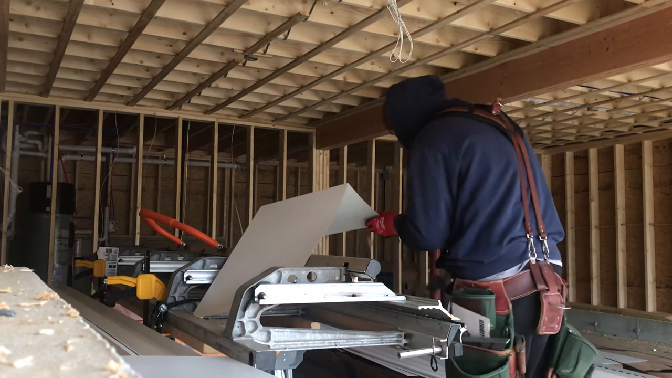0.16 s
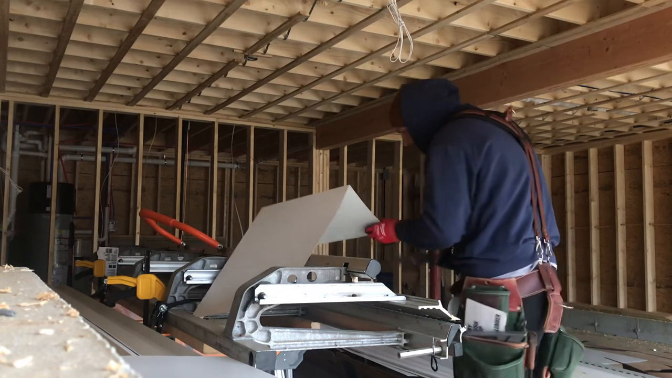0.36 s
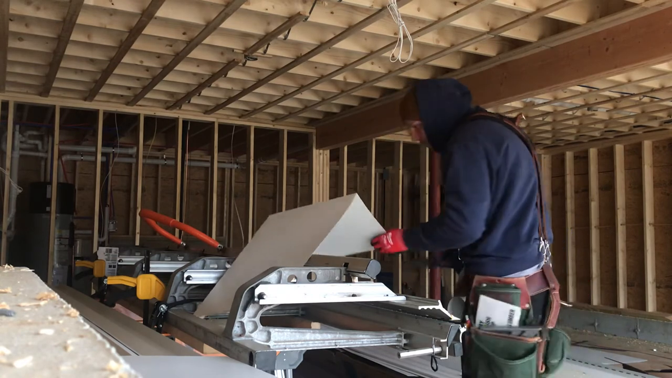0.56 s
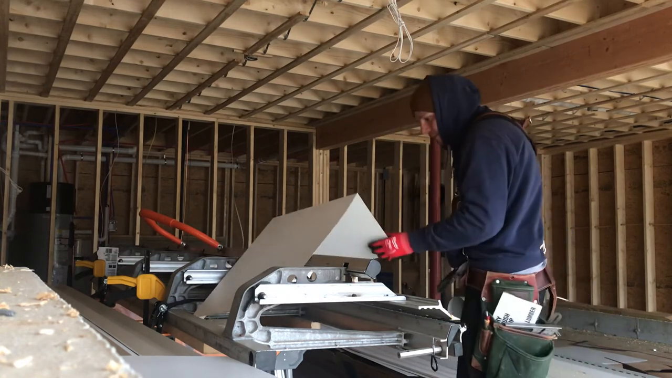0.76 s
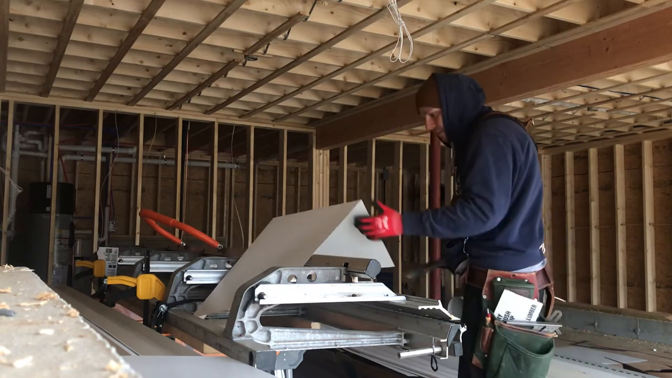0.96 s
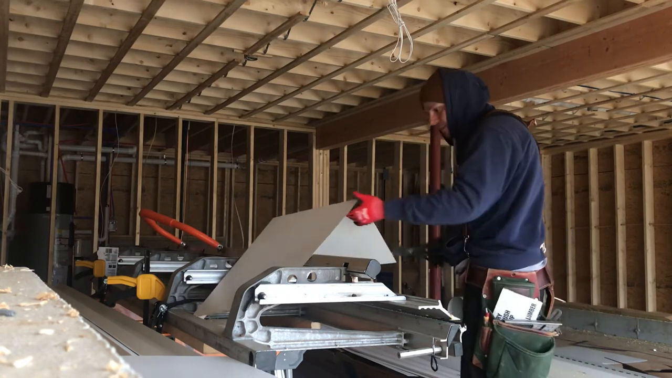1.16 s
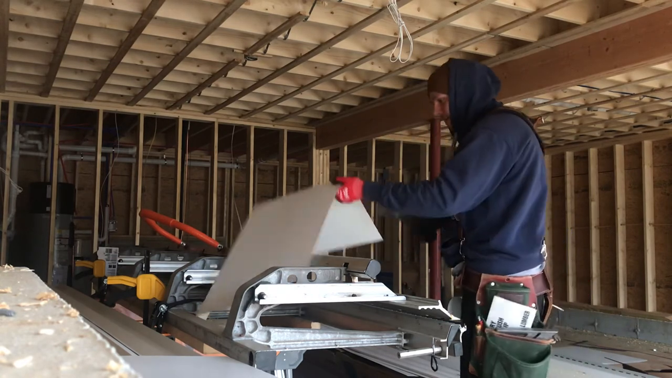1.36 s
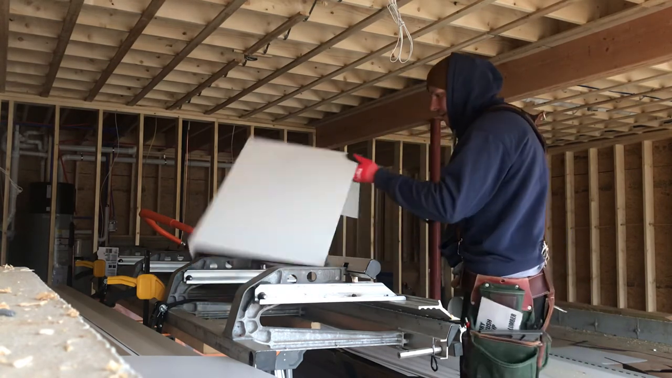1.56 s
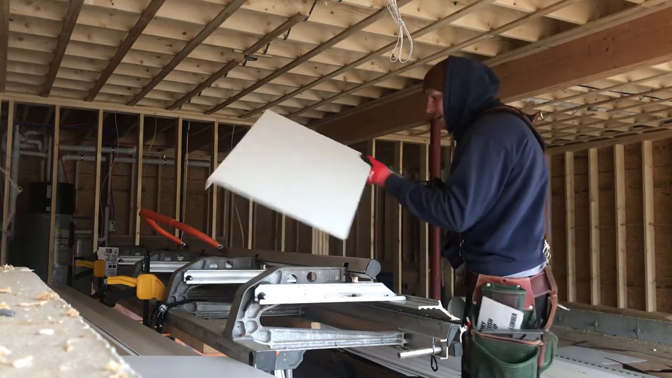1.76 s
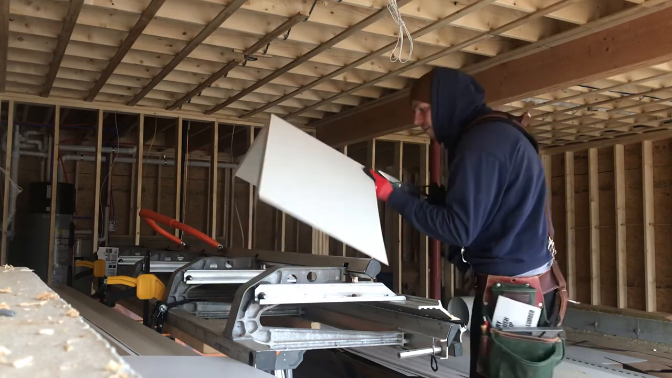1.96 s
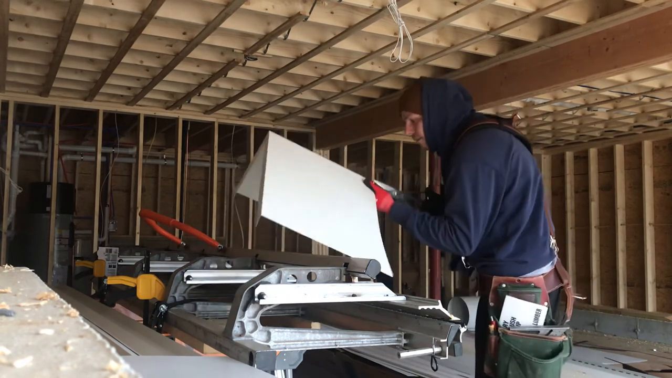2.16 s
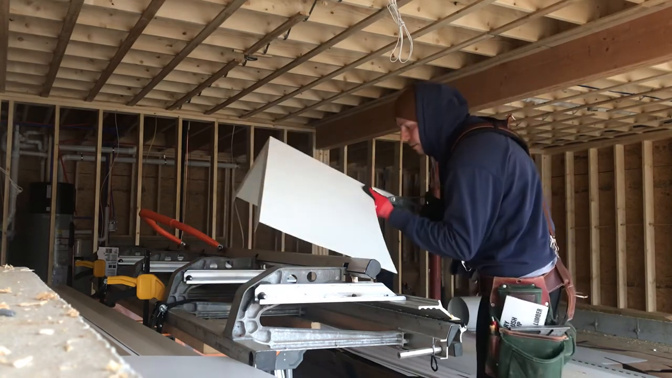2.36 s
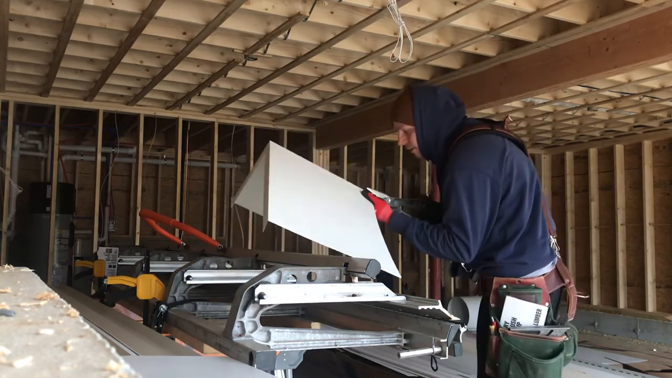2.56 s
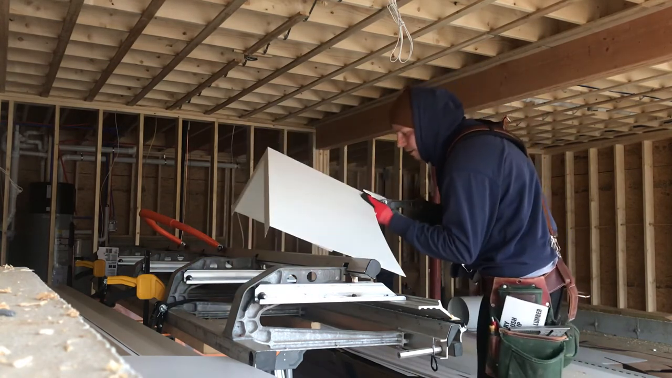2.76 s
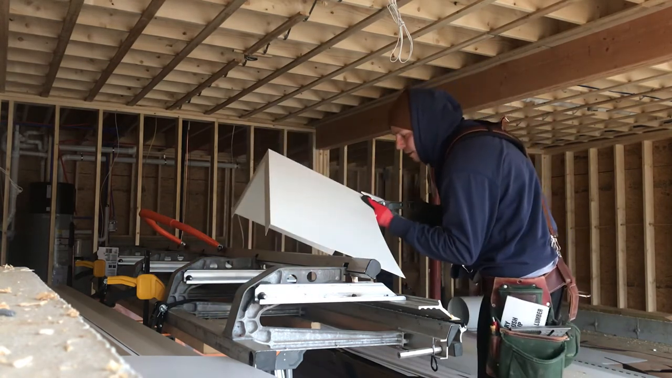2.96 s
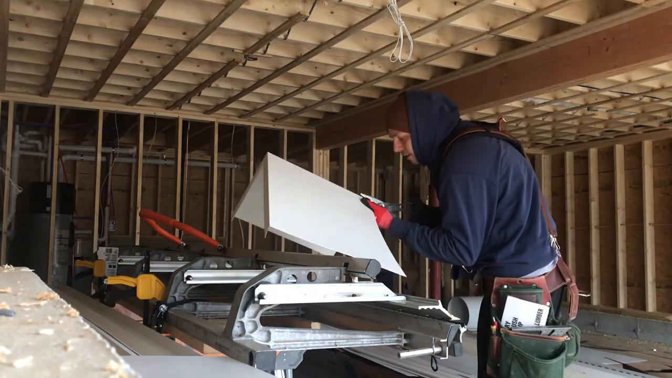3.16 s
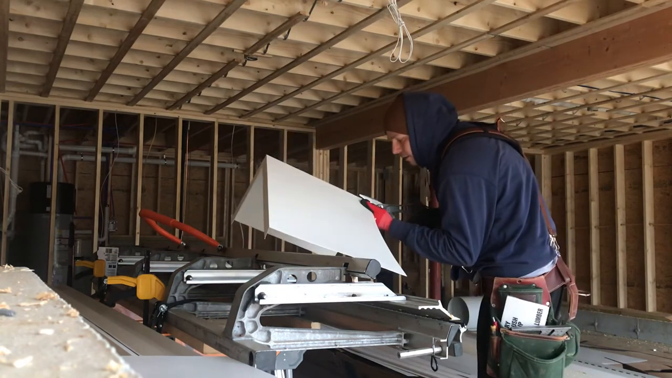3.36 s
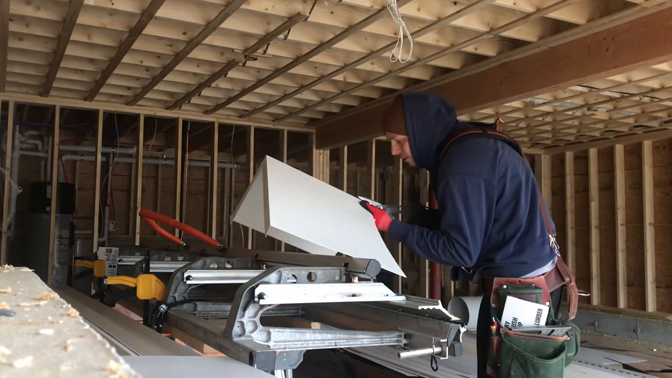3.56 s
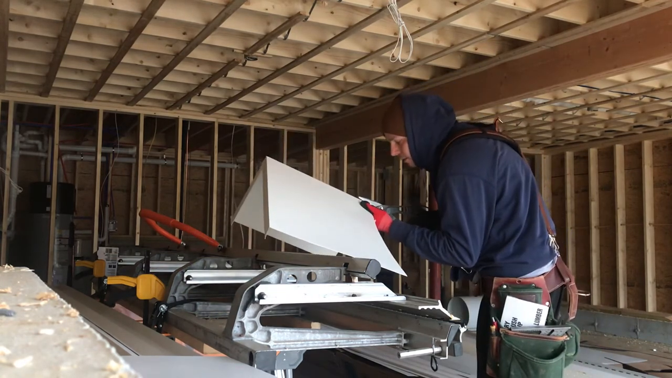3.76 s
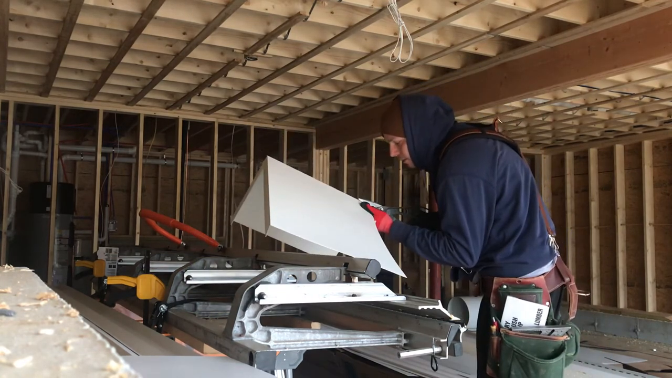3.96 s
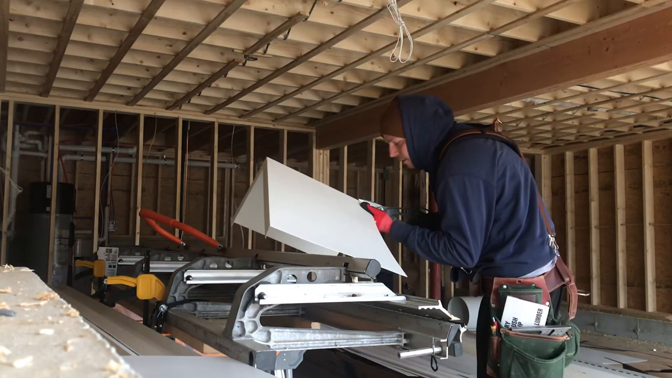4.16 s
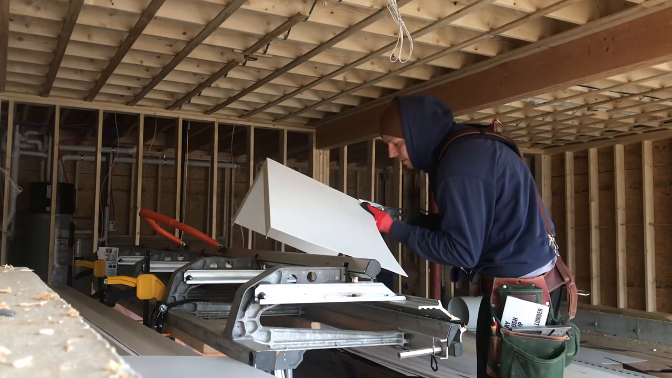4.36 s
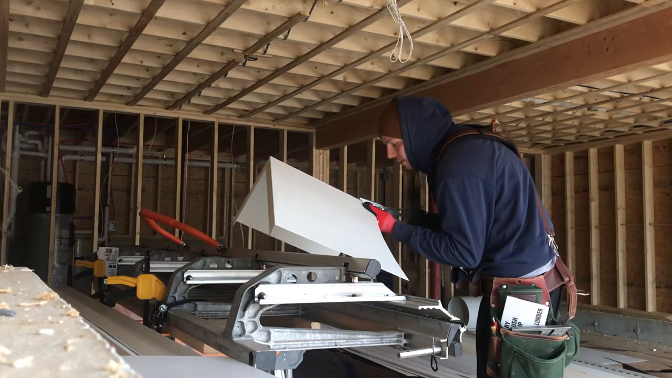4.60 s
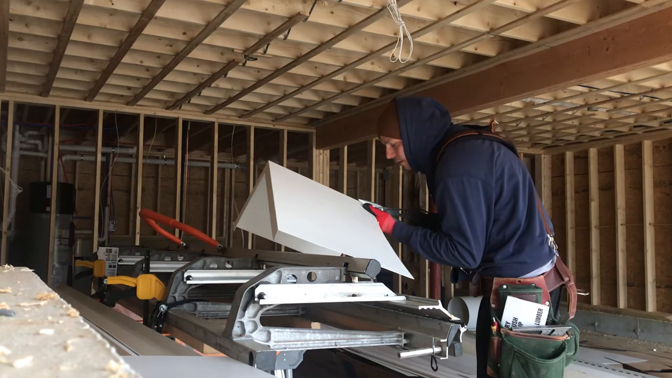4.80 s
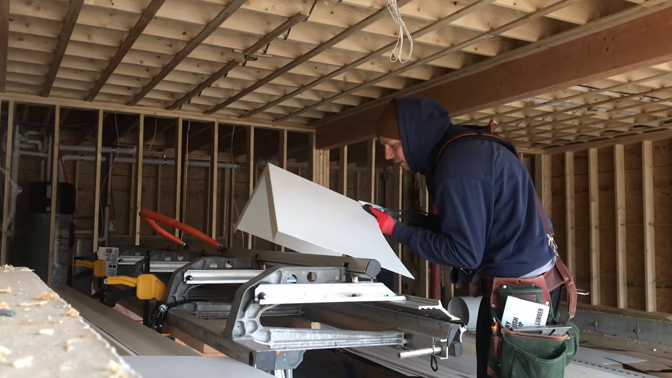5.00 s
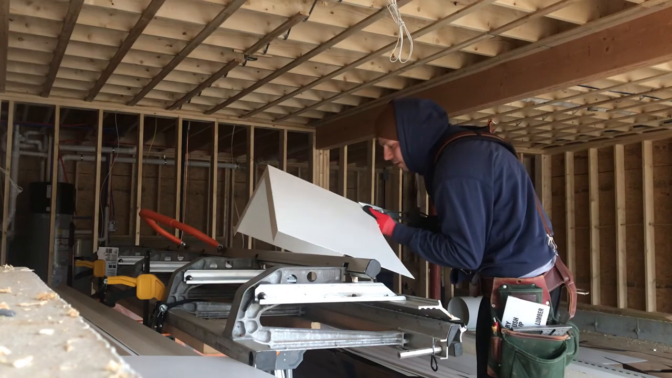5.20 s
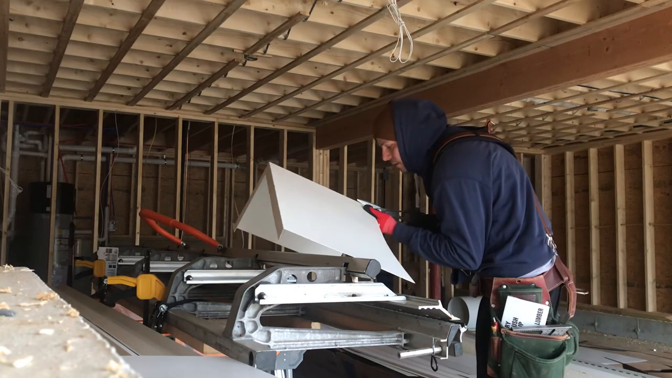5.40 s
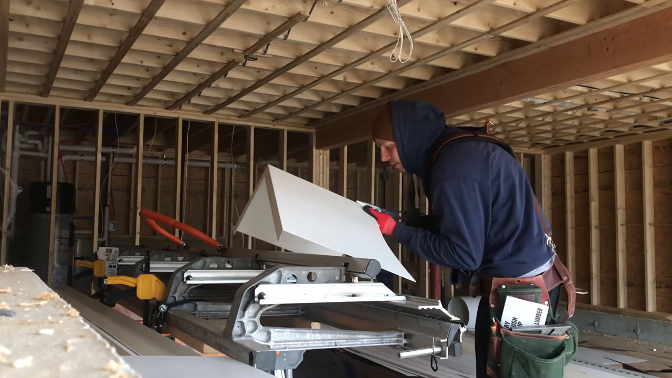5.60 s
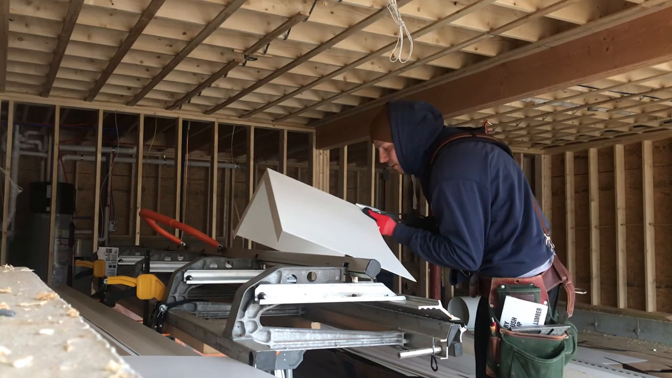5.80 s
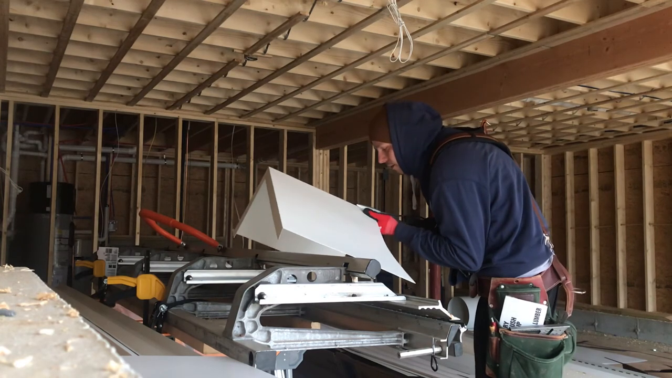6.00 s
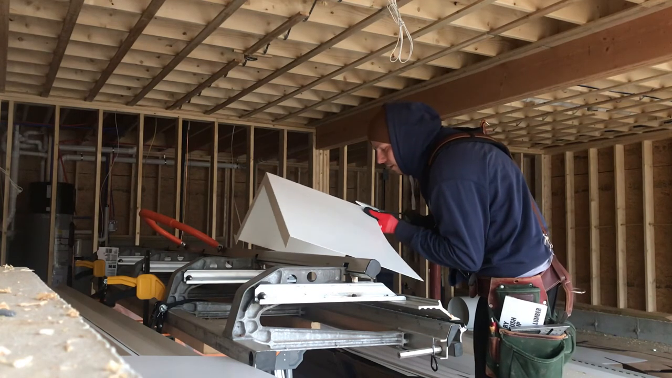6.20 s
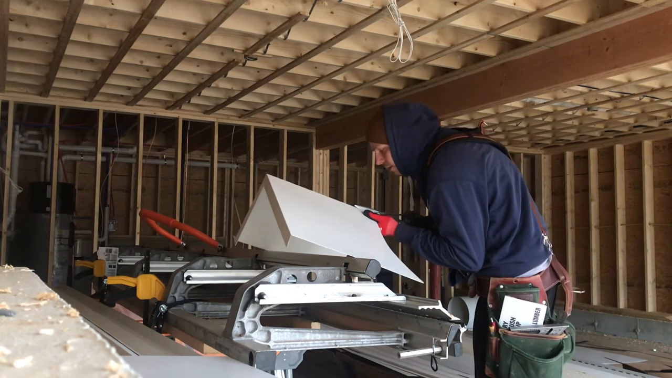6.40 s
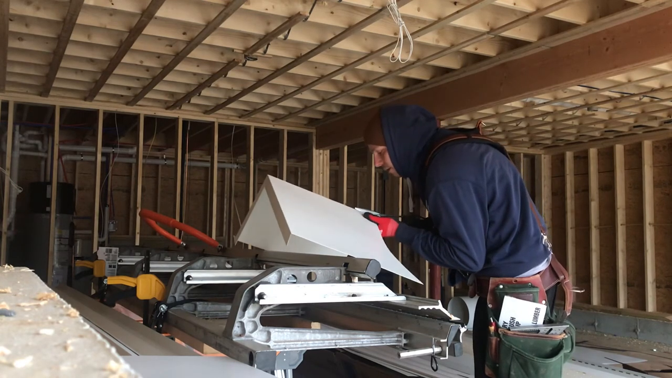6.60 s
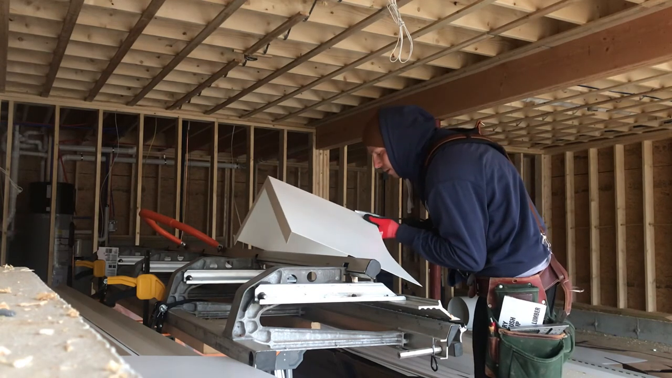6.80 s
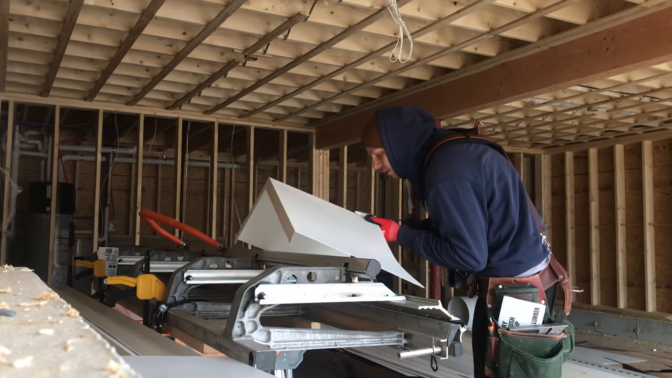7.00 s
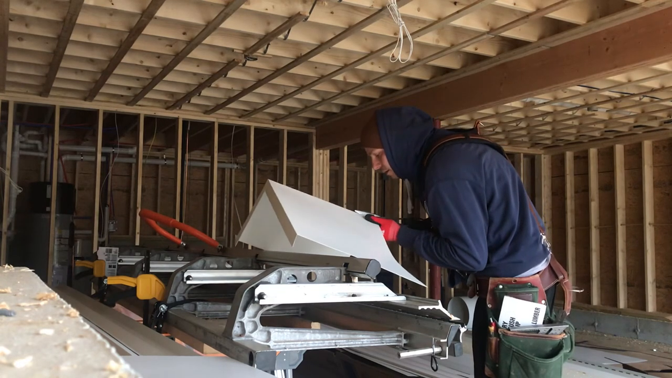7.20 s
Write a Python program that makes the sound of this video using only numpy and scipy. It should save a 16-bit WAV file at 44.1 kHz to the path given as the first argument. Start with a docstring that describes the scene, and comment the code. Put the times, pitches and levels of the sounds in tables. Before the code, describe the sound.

Over a steady machine hum, sheet aluminium clangs, squeaks and booms as it flexes, followed by faint finger ticks and a light double landing.

```python
"""A machine hums throughout while a thin, folded aluminium sheet comes free of a steel bending brake with a clank.
Noise bursts and ringing tones make the clank; knocks, scraping, squeaks and a thunder-like wobble follow.
Then come light ticks under a gloved hand, made of tiny noise cracks, and a hollow rub with a falling pitch.
Last the sheet is set down, fold first and then edge, which rings its flange; a few more knocks and bends follow.
Filtered pulses and noise make the rubbing and scraping; fading noise is the echo of a bare timber room."""
import sys
import numpy as np
from scipy import signal
from scipy.fft import rfft, irfft
from scipy.io import wavfile
from scipy.ndimage import map_coordinates

SR = 44100
rng = np.random.default_rng(int(sys.argv[2]) if len(sys.argv) > 2 else 0)


def store_pcm(level_fs):
    """Save levels as 16-bit WAV."""
    pcm = np.round(np.clip(level_fs, -1, 1) * 32767).astype(np.int16)
    wavfile.write(sys.argv[1], SR, np.atleast_2d(pcm).T)


N = 319725
T = np.arange(N) / SR
RING_T = T[:SR]  # one second, long enough for any single ring

# In all tables "ring time" means the seconds a sound takes to fade by 60 dB.
# How long the thin metal rings. Each row: pitch in Hz, ring time in seconds.
SHEET_RING_TIME = [(200, 0.68), (1000, 0.24), (4000, 0.29), (14000, 0.098)]
# How long the timber room rings. Each row: pitch in Hz, ring time in seconds.
ROOM_RING_TIME = [(150, 1), (600, 0.83), (2000, 0.47), (5000, 0.61), (14000, 0.23)]
TOP_HZ = 15850  # the highest pitch let through

# A machine elsewhere in the building. Each row: pitch in Hz, average (rms) level in dB.
HUM = [(73.4, -34), (138, -51.5), (193.5, -53), (295.6, -61.5), (801, -66)]
# Still air of the building. Each row: pitch in Hz, level in dB per Hz.
AIR = [(22, -99), (45, -71), (95, -65), (140, -71.5), (220, -77), (330, -79.5), (460, -93.5), (800, -86.5),
       (1100, -95), (2000, -101), (4000, -110), (8000, -119), (15500, -120)]
AIR_SWELL_DB = 0.5

# Soft rubbing of gloves and clothes, and the airy treble of the bending panel (near 1.5 and 2.2 s).
# Each row: middle in seconds, length in seconds, level in dB.
SOFT_SWELLS = [(0.01, 0.15, -51), (0.547, 0.67, -48), (1.33, 0.085, -34.5), (1.516, 0.28, -43.5),
               (1.844, 1, -58.5), (2.158, 0.16, -44), (4.346, 0.13, -58), (4.644, 0.27, -60.5),
               (5.035, 0.18, -59), (5.363, 0.22, -52), (5.763, 0.24, -59), (6.12, 0.17, -48.5),
               (6.695, 0.74, -58), (6.985, 0.16, -47.5)]
# Tone of these soft sounds. Each row: pitch in Hz, relative level in dB.
SOFT_COLOUR = [(100, -17), (350, 8.5), (700, 3), (1200, 3.5), (1900, -5.5), (3000, -11), (5000, -18),
               (9000, -23), (15000, -32)]
REST_RUB_DB = -61  # cloth is never quite still
# The glove hisses over the smooth face. Each row: middle in seconds, length in seconds, level in dB.
SWISHES = [(0.0, 0.078, -58.5), (0.49, 0.1, -56), (1.32, 0.18, -58), (1.85, 0.33, -67), (4.65, 0.2, -72),
           (5.34, 0.08, -64), (6.8, 0.31, -67)]
# Tone of that hiss. Each row: pitch in Hz, relative level in dB.
SWISH_COLOUR = [(1500, -15), (3800, 7.5), (5700, 5), (8500, -6), (15000, -11)]

# The sheet strikes the brake and rebounds. Each row: start in seconds, relative level in dB.
CLANKS = [(0.0955, -3.5), (0.105, 0), (0.138, -22)]
# Tone of the clatter. Each row: pitch in Hz, relative level in dB.
CLANK_COLOUR = [(100, -37), (180, -13.5), (250, 6), (320, -8), (400, -11.5), (620, -5), (820, -7.5),
                (1080, 0.5), (1350, -8), (1700, 0.5), (2000, -19.5), (2500, -8), (3400, -18.5), (6000, -22),
                (15000, -29.5)]
CLATTER_T60_S = 0.2
# Ringing groups of tones in the brake. Each row: pitch in Hz, relative level in dB, ring time in seconds.
BRAKE = [(521.5, -7.5, 0.65), (614, -2, 0.45), (781, -6, 0.84), (1063, 7.5, 0.22), (1310, -0.5, 0.3),
         (1520, -3.5, 0.44), (1610, 2, 0.28), (1817, -6, 0.33), (2382, -9.5, 0.41), (2550, -13.5, 0.45),
         (2750, -10, 0.21), (3150, -10, 0.32), (3780, -8.5, 0.31), (4000, -13, 0.41), (4170, -8, 0.31),
         (4380, -13, 0.19), (5300, -10, 0.23), (5550, -16, 0.22), (6000, -12, 0.22), (6680, -11, 0.2),
         (8840, -10.5, 0.16)]
BRAKE_WIDTH_SHARE = 0.0152  # spread of each group as a share of its pitch
BRAKE_BLOOM_CYCLES = 9.4  # the steel needs about this many cycles to speak, so its low notes come late

# The panel is bent. Each row: start in seconds, length in seconds, relative level in dB,
# brightness in dB per octave.
FLEXES = [(0.497, 0.24, -35, -0.5), (0.882, 0.4, -34.5, -6.5), (1.268, 0.26, -21.5, 1.3),
          (1.75, 0.21, -44, -13.5), (2.071, 0.044, -17.5, -0.2), (2.575, 0.04, -37, -6.5),
          (6.253, 0.387, -51, 1), (6.962, 0.059, -31.5, -2.5), (7.212, 0.06, -41, -4)]
FLEX_ATTACK_SHARE, FLEX_RELEASE_S = 0.33, 0.16  # a bend builds up over this share of its length
SWAY_DB, SWAY_T60_S = -8.5, 1.17  # let go, the panel sways on
SWAY_DULLING_PER_S = 11.6  # dB per octave lost each second
# The panel slaps against itself as it swings. Each row: start in seconds, relative level in dB.
FLAPS = [(1.345, -29), (1.362, -31), (1.4, -32), (1.438, -34), (1.469, -19.5), (2.082, -29), (2.104, -21),
         (2.118, -24)]
FLAP_T60_S = 0.024
# Main ringing tones of the panel. Each row: pitch in Hz, relative level in dB, ring time in seconds.
PANEL = [(190.8, -2, 0.59), (243.5, -2, 0.7), (307.5, -11, 0.89), (330.5, 3.5, 0.38), (368, -2.5, 0.42),
         (438, -5, 0.81), (479, 0.5, 0.44), (533, -8, 0.3), (616, -1, 0.37), (667, -5, 0.57),
         (754, -12, 0.45), (792, -6, 0.51), (840, -9, 0.38), (898, -8, 0.36), (985, -5, 0.44),
         (1048, -12, 0.38), (1180, -15, 0.28)]
PANEL_WANDER_HZ, PANEL_WANDER_PER_S = 16.7, 18  # the changing curve pulls each tone its own way
# Tone of the panel's countless other rings. Each row: pitch in Hz, relative level in dB.
PANEL_COLOUR = [(70, -50.5), (130, -8.5), (175, 2.5), (250, -2.5), (340, 5), (440, -7.5), (540, -5),
                (630, -3), (800, -3.5), (1200, -9), (1500, -21.5), (2000, -39.5), (4000, -47), (9000, -57)]
# Short low booms: the clank's (0.105 s), the landing's thump (6.285 s), and the panel's buckles.
# Each row: start in seconds, pitch in Hz, level in dB, ring time in seconds.
BOOMS = [(0.105, 250.6, -33.5, 0.12), (0.999, 191.8, -37.5, 0.32), (1.349, 350, -24.5, 0.062),
         (1.432, 360, -25.5, 0.1), (1.468, 336.7, -18, 0.06), (1.478, 180, -24.5, 0.22),
         (2.073, 345, -23, 0.24), (2.097, 614, -22.5, 0.19), (2.111, 663, -30, 0.22),
         (6.285, 280, -25.5, 0.057), (6.396, 345, -40, 0.17), (7.016, 172.9, -35, 0.21)]
BOOM_SPILL_DB = -11.5  # each boom comes with a jolt to the rest of the panel
BOOM_ATTACK_S, BOOM_WANDER_HZ = 0.0058, 12.58
BOOM_SAG_SHARE, BOOM_SAG_S = 0.055, 0.019  # the pitch starts sharp by this share and settles

# The sheet knocks on the brake. Each row: start in seconds, relative level in dB,
# brightness in dB per octave, slant from 0 (square) to 1 (glancing).
KNOCKS = [(0.405, -46, 0, 1), (0.541, -30, -3, 0.52), (0.961, -32, 1.5, 0), (1.177, -40.5, 1.5, 0.51),
          (1.252, -41, 1.5, 0.19), (1.442, -43, 5.5, 0.82), (2.061, -32, 2.5, 0.86),
          (2.212, -40, 2.5, 0.18), (2.368, -44.5, 1, 0), (2.45, -44, 2.5, 0.19), (2.562, -31, -1.5, 0.027),
          (5.486, -51, 3.5, 0), (6.204, -46.5, 1, 0), (6.646, -39, 0.5, 0.11), (6.969, -44.5, 6, 0.075),
          (7.222, -50, 3, 0)]
# Tone of a square knock. Each row: pitch in Hz, relative level in dB.
KNOCK_COLOUR = [(80, -22), (200, -6), (330, 7.5), (500, -8), (650, -1), (1200, -2), (1800, -11),
                (3100, -18.5), (5000, -19), (8500, -27), (15000, -35)]
# A glancing contact trades thump for rasp. Each row: pitch in Hz, added level in dB.
GLANCE_COLOUR = [(300, -11), (900, 4.5), (2300, 12), (6000, 4)]
KNOCK_DB, HARDNESS_HZ = 37.5, 977  # level added to all knocks; brightness acts above this pitch
CRACK_DB, GLANCE_CRACK_DB, GLANCE_ATTACK_S = -4.5, -26, 0.0044  # glancing: weaker crack, slower start

# The edge snaps on the steel. Each row: start in seconds, relative level in dB.
SNAPS = [(0.579, -35), (0.597, -16), (0.826, -35), (0.962, -38)]
# Tone of the snaps. Each row: pitch in Hz, relative level in dB.
SNAP_COLOUR = [(1500, -34), (3000, -12), (4500, 4.5), (7000, -4.5), (10500, -1.5), (15000, -13)]
# The edge slides in short pushes. Each row: start in seconds, length in seconds, starting relative
# level in dB, starting brightness in dB per octave.
SCRAPES = [(0.592, 0.077, -28, 4), (0.77, 0.015, -41, -1), (0.825, 0.043, -31.5, 2),
           (0.935, 0.056, -37.5, 4.5)]
SCRAPE_ATTACK_S, SCRAPE_RELEASE_S = 0.0043, 0.32
STUTTER_DB, STUTTER_PER_S = 1, 70  # the edge catches unevenly as it goes
SCRAPE_SWELL_DB_PER_S, SCRAPE_DULLING_PER_S = 30, 44  # dulling is in dB per octave each second
SCRAPE_PIVOT_HZ = 5030  # brightness leans the tone about this pitch
# A thin edge on steel pushes mostly in the treble. Each row: pitch in Hz, relative level in dB.
EDGE_COLOUR = [(700, 2), (1700, 4.5), (2600, -3), (3500, 0.5), (5500, -4.5), (7000, -2), (10000, -2),
               (15000, -1.5)]
# Tone of the scrape's grit. Each row: pitch in Hz, relative level in dB.
GRIT_COLOUR = [(700, -9), (2500, -1), (5500, 3.0), (9000, -8.5), (15000, -9)]
# Tones that the scraping edge excites. Each row: pitch in Hz, width in Hz, relative level in dB where
# the slide starts, relative level in dB further along the edge.
SLIDE = [(1295, 30, -8, -20), (1672, 28, -5, -20), (1935, 30, -10, -16), (2310, 30, -10, -14),
         (2585, 30, -5, -8), (3045, 40, -9, -9), (3200, 45, -13, -6), (3550, 60, -9, -8),
         (4190, 60, -7, -5), (4475, 44, -8, -4), (4670, 28, -12, -5), (4870, 50, -3, -6),
         (5080, 41, -11, -15), (5470, 45, -5, -3), (5540, 40, 0, -10), (6100, 70, -5, -11),
         (6235, 41, -6, 0), (6460, 50, -3, -4), (6935, 36, -9, -1), (7530, 70, -10, -10),
         (8045, 60, -9, -12), (8385, 80, -14, -15), (8795, 70, -11, -13), (8960, 43, -14, -13),
         (9530, 36, -14, -16), (9940, 90, -12, -10), (10400, 31, -22, -11), (10760, 70, -14, -14),
         (11800, 100, -11, -11), (12020, 44, -16, -13), (12900, 70, -20, -9), (13200, 40, -14, -10),
         (14200, 80, -19, -15)]
SLIDE_SHIFT_S = 0.83  # the contact jumps along the edge at this time
SLIDE_RING = 1.5  # ring time in seconds of a tone 1 Hz wide
SUSTAIN_DB, SUSTAIN_T60_S = -7.5, 0.15
SUSTAIN_WAVER_SHARE = 0.445  # pitch waver as a share of the width
SUSTAIN_FLICKER_DB, SUSTAIN_FLICKER_PER_S = 5, 28

# Short single tones: squeaks of the edge, and two small tinks near 900 Hz at 6.65 and 6.70 s.
# Each row: start in seconds, length in seconds, pitch in Hz, level in dB.
SHORT_TONES = [(0.659, 0.065, 1689, -47), (0.655, 0.021, 5510, -34), (0.758, 0.014, 5510, -49),
               (5.76, 0.09, 1942, -67), (6.645, 0.013, 920, -47), (6.696, 0.012, 900, -43.5)]
TONE_ATTACK_S, TONE_RELEASE_S, TONE_WAVER_HZ = 0.015, 0.052, 12.4

# Light dry ticks under the fingers. Each row: start in seconds, level in dB, brightness in dB per octave.
TICKS = [(2.723, -61, 9), (4.200, -53, -3), (4.238, -56, -5), (4.315, -51.5, -5), (4.341, -54, -2),
         (4.378, -56, 2.5), (4.579, -55, -2), (4.654, -59, -1), (4.728, -54, -8), (4.766, -63, 10),
         (4.969, -55, -1.5), (5.014, -49, 1.5), (5.042, -54.5, 5.5), (5.102, -55, 4.5), (5.267, -53.5, 1.5),
         (5.683, -51.5, 1), (6.050, -52, -1), (6.591, -47.5, 1.5), (6.708, -48, -1), (6.87, -60, 9),
         (6.885, -52, -1), (6.899, -50, 2), (6.916, -52, 6), (6.931, -48, 3), (6.951, -57, 7)]
# Tone of a tick. Each row: pitch in Hz, relative level in dB.
TICK_COLOUR = [(250, -3), (700, 14), (1200, 16), (2000, 4), (3200, -7), (5000, -17), (9000, -33),
               (15000, -36)]
TICK_T60_S, TICK_PIVOT_HZ = 0.028, 1500  # brightness leans the tone about this pitch

# The glove drags across the panel and its rub sinks in pitch as it slows.
DRAG_S, DRAG_LENGTH_S, DRAG_DB = 5.32, 0.13, -50
DRAG_START_HZ, DRAG_END_HZ, DRAG_WIDTH_HZ = 1060, 280, 620
DRAG_ATTACK_S, DRAG_RELEASE_S = 0.048, 0.1

# The sheet drops on to the brake, first its fold and then its edge. Each row: start in seconds,
# relative level in dB, brightness in dB per octave, slant from 0 (square) to 1 (glancing),
# level of the ring in dB.
LANDINGS = [(6.2834, -23, -3.5, 0.11, -26), (6.4244, -29, 2.5, 0.39, -32.5)]
# Ringing groups of tones in the folded flange. Each row: pitch in Hz, relative level in dB when the fold
# lands, relative level in dB when the edge lands, ring time in seconds.
FLANGE = [(260, 3, -16, 0.14), (345, 3, -8, 0.18), (583, 0.5, -1, 0.32), (765, -5, -17, 0.2),
          (900, 2.5, -6, 0.1), (996, -10, 0.5, 0.36), (1106, 1, 0, 0.17), (1264, -9, 2, 0.25),
          (1380, -26, -1, 0.26), (1725, -11, -7, 0.16), (1965, -11, -14, 0.22), (2390, -15, -12, 0.14),
          (2990, -14, -18, 0.14), (4200, -27, -4, 0.19), (5250, -41, -9, 0.1), (6330, -28, -7, 0.12),
          (8900, -28, -1, 0.066), (11700, -35, -5, 0.056)]
FLANGE_WIDTH_SHARE = 0.052  # spread of each group as a share of its pitch


def undb(db):
    """Turn decibels into a plain gain."""
    return 10 ** (np.asarray(db) / 20)


def unit(x):
    """Scale a response to unit energy."""
    return x / np.sqrt(np.sum(x ** 2))


def at_hz(hz, points):
    """Read a value between (Hz, value) points, spaced by octaves as the ear hears pitch."""
    f, value = np.transpose(points)
    return np.interp(np.log(np.maximum(hz, 1)), np.log(f), value)


def ring(x, response):
    """Let every sample of a signal start its own copy of the response."""
    return signal.fftconvolve(x, response)[:len(x)]


def colour(x, points, size=4096):
    """Filter to a tone given as (Hz, dB) points, with no sound ahead of its cause."""
    log_gain = np.log(undb(at_hz(np.fft.rfftfreq(size, 1 / SR), points)))
    cepstrum = irfft(log_gain)
    # folding the cepstrum forwards in time makes the filter minimum phase
    cepstrum[1:size // 2] *= 2
    cepstrum[size // 2 + 1:] = 0
    return ring(x, irfft(np.exp(rfft(cepstrum))))


def bands(x):
    """Split a signal into overlapping octave bands: (centre Hz, band)."""
    centres = 125 * 2. ** np.arange(8)
    spectrum, hz = rfft(x), np.fft.rfftfreq(len(x), 1 / SR)
    return [(c, irfft(spectrum * at_hz(hz, np.c_[centres, centres == c]), len(x))) for c in centres]


def tilt(x, slope_db, pivot_hz):
    """Brighten or dull a signal about a pivot by a moving slope in dB per octave, limited far from it."""
    out = 0
    for hz, band in bands(x):
        octaves = np.clip(np.log2(hz / pivot_hz), -1.5, 1.8)
        out = out + band * undb(slope_db * octaves)
    return out


def fade(t60):
    """Free decay by 60 dB in t60 seconds."""
    return np.exp(-np.log(1000) * RING_T / t60)


def dense(t60_points):
    """Noise stands for rings too many to count, each octave dying at its own pace."""
    noise = rng.standard_normal(SR)
    return unit(sum(band * fade(at_hz(hz, t60_points)) for hz, band in bands(noise)))


def modes(table, bloom_cycles=1e-3):
    """Fading tones (Hz, dB, t60) that build up over some cycles and start at any point of their swing."""
    out = 0
    for hz, db, t60 in table:
        bloom = 1 - np.exp(-np.minimum(hz * RING_T / bloom_cycles, 20))
        tone = np.sin(2 * np.pi * (hz * RING_T + rng.random()))
        out = out + undb(db) * fade(t60) * bloom * tone
    return unit(out)


def cluster(hz, width, db, t60):
    """Five close (Hz, dB, t60) tones, unevenly spaced and strongest in the middle, so they beat."""
    offsets = np.linspace(-.7, .7, 5) + rng.uniform(-.12, .12, 5)
    return [(hz + k * width, db - 7 * abs(k), t60) for k in offsets]


def walk(rate):
    """Smooth random wandering with a spread near 1, taking about rate new values a second."""
    points, coarse = rng.standard_normal(4096), T[::16]
    return np.interp(T, coarse, map_coordinates(points, [coarse * rate], order=2, mode="mirror"))


def wavering(hz, waver_hz, rate):
    """Phase in radians of a pitch that wanders about hz."""
    return 2 * np.pi * np.cumsum(hz + waver_hz * walk(rate)) / SR


def bend(x, depth, rate):
    """A changing curve of the sheet pulls all its pitches together: time slips by about depth seconds."""
    return np.interp(T + depth * walk(rate), T, x)


def hiss(force, t60):
    """Every pulse of a force lets off its own short burst of noise."""
    power = ring(force ** 2, unit(fade(t60)) ** 2)
    return np.sqrt(np.maximum(power, 0)) * rng.standard_normal(N)


def blows(table):
    """One impulse for each (s, dB), with the energy of 20 ms at that rms level."""
    force = np.zeros(N)
    for s, db in table:
        force[int(s * SR)] += undb(db) * np.sqrt(SR / 50)
    return force


def slips(rate, spread_db):
    """Surfaces stick and slip: irregular pulses of uneven size, rms 1."""
    happens = rng.random(N) < rate / SR
    direction = rng.choice([-1, 1], N)
    force = happens * direction * undb(spread_db * np.clip(rng.standard_normal(N), -2, 2))
    return force / force.std()


def stroke(s, length, attack, release):
    """Attack, hold until s + length, then release by 60 dB in release seconds."""
    rise = np.clip((T - s) / attack, 0, 1)
    return rise * np.exp(-np.log(1000) * np.maximum(T - s - length, 0) / release)


def blend(strokes):
    """Join (gain, brightness) strokes: powers add and stronger strokes weigh more in the brightness."""
    gains, slopes = np.swapaxes(strokes, 0, 1)
    power = np.sum(gains ** 2, axis=0) + 1e-18
    return np.sqrt(power), np.sum(gains ** 2 * slopes, axis=0) / power


def swells(table):
    """Summed power of bell-shaped (middle s, length s, dB) swells."""
    return sum((undb(db) * np.exp(-(2 * (T - s) / length) ** 2)) ** 2 for s, length, db in table)


def in_room(x, wet_db):
    """Add the bare studs and joists; their reflections build up over the first hundredths of a second."""
    echoes = unit(dense(ROOM_RING_TIME) * (1 - fade(0.033)))
    return x + undb(wet_db) * ring(x, echoes)


def hum():
    """Steady machine tones that waver slightly, over the noise of the building's air."""
    tones = 0
    for hz, db in HUM:
        level = np.sqrt(2) * undb(db + 0.64 * walk(6.8))
        drift = 0.15 * (hz / HUM[0][0]) * walk(2.49)  # radians
        tones = tones + level * np.sin(2 * np.pi * hz * T + drift)
    air = colour(rng.standard_normal(N), AIR) * np.sqrt(SR / 2)
    return tones + air * undb(AIR_SWELL_DB * walk(2.56))


def soft_sounds():
    """Tiny noise bursts swell and fade: gloves and cloth rubbing or hissing, and the bending panel's airy treble."""
    grains = in_room(colour(hiss(slips(480, spread_db=0.5), t60=0.022), SOFT_COLOUR), wet_db=-2.5)
    swish = colour(hiss(slips(900, spread_db=3.0), t60=0.022), SWISH_COLOUR)
    grain_gain = np.sqrt(undb(REST_RUB_DB) ** 2 + swells(SOFT_SWELLS))
    return grains / grains.std() * grain_gain + swish / swish.std() * np.sqrt(swells(SWISHES))


def clank():
    """The sheet comes free with a clatter; the first strike sets the brake ringing in close, beating tones."""
    clatter = colour(hiss(blows(CLANKS), t60=CLATTER_T60_S), CLANK_COLOUR)
    clatter = in_room(clatter, wet_db=-4.5)
    tones = [tone for hz, db, t60 in BRAKE for tone in cluster(hz, BRAKE_WIDTH_SHARE * hz, db, t60)]
    steel = modes(tones, bloom_cycles=BRAKE_BLOOM_CYCLES)
    return undb(-11.5) * clatter + undb(-18.5) * ring(blows(CLANKS[:1]), steel)


def flex(s, length, db, brightness):
    """One bend of the panel: it builds, holds, and drops to a weaker sway that dulls as it dies."""
    attack = FLEX_ATTACK_SHARE * length
    held = stroke(s, length, attack, FLEX_RELEASE_S)
    sway = undb(SWAY_DB) * stroke(s, length, attack, SWAY_T60_S)
    dulling = SWAY_DULLING_PER_S * np.clip(T - s - length, 0, SWAY_T60_S / 2)
    return undb(db) * np.maximum(held, sway), brightness - dulling


def panel_ring(force):
    """The main tones of the panel ring, each wandering in pitch by itself."""
    rings = [undb(db) * fade(t60) * np.sin(2 * np.pi * hz * RING_T) for hz, db, t60 in PANEL]
    voices = 0
    for (hz, _, _), one in zip(PANEL, rings):
        # each tone keeps its own slightly fast or slow clock
        clock = wavering(hz, PANEL_WANDER_HZ, PANEL_WANDER_PER_S) / (2 * np.pi * hz)
        voices = voices + np.interp(clock, T, ring(np.interp(T, clock, force), one))
    return voices / np.sqrt(np.sum(np.square(rings)))


def wobble():
    """Bends, slaps and jolts shake the panel: a dense, uneven thunder with a few tones ringing on."""
    gain, slope_db = blend([flex(*row) for row in FLEXES])
    crackle = slips(6000, spread_db=0.5) * gain * undb(1.0 * walk(60))
    force = tilt(crackle, slope_db, pivot_hz=372.0)
    jolts = undb(BOOM_SPILL_DB) * blows([(s, db) for s, _, db, _ in BOOMS])
    flaps = hiss(undb(-0.5) * blows(FLAPS), t60=FLAP_T60_S)
    thunder = in_room(colour(force + flaps + hiss(jolts, t60=0.079), PANEL_COLOUR), wet_db=-9)
    return bend(undb(9.5) * thunder + undb(-9) * panel_ring(force + jolts), depth=0.00029, rate=9.1)


def booms():
    """Each strike or buckle gives one short, hollow tone that sags in pitch as it settles."""
    out = 0
    for s, hz, db, t60 in BOOMS:
        pitch = hz * (1 + BOOM_SAG_SHARE * np.exp(-np.maximum(T - s, 0) / BOOM_SAG_S))
        tone = np.sin(wavering(pitch, BOOM_WANDER_HZ, rate=70))
        out = out + undb(db) * stroke(s, BOOM_ATTACK_S, BOOM_ATTACK_S, t60) * tone
    return in_room(np.sqrt(2) * out, wet_db=-11)


def knocks(table):
    """Each contact is a crack and a wash of the sheet's rings; how hard and squarely it lands sets the tone."""
    out = np.zeros(N + SR)
    hz, square_db = np.transpose(KNOCK_COLOUR)
    for s, db, brightness, glancing in table:
        hardness = brightness * np.maximum(np.log2(hz / HARDNESS_HZ), 0)
        shape = square_db + hardness + glancing * at_hz(hz, GLANCE_COLOUR)
        crack = unit(rng.standard_normal(SR) * fade(0.011))
        crack_gain = undb(CRACK_DB + glancing * GLANCE_CRACK_DB)
        attack = np.minimum(RING_T / max(glancing * GLANCE_ATTACK_S, 1 / SR), 1)
        hit = unit(attack * (dense(SHEET_RING_TIME) + crack_gain * crack))
        start = int(s * SR)
        out[start:start + SR] += colour(hit, np.c_[hz, shape]) * undb(db + KNOCK_DB)
    return in_room(out[:N], wet_db=-7.5)


def push(s, length, db, brightness):
    """One push of the edge: it bites quickly, swells and dulls as it digs in, then lets go."""
    swell_db = SCRAPE_SWELL_DB_PER_S * np.clip(T - s, 0, length)
    level = undb(db + swell_db + STUTTER_DB * walk(STUTTER_PER_S))
    gain = level * stroke(s, length, SCRAPE_ATTACK_S, SCRAPE_RELEASE_S)
    return gain, brightness - SCRAPE_DULLING_PER_S * np.clip(T - s, 0, 2 * length)


def sustained(gain, slope_db, along):
    """The edge also locks on to its resonances; each holds a thin, wavering tone that comes and goes."""
    held = np.sqrt(np.maximum(ring(gain ** 2, unit(fade(SUSTAIN_T60_S)) ** 2), 0))
    tones = 0
    for hz, width, start_db, end_db in SLIDE:
        place_db = start_db + along * (end_db - start_db)
        bright_db = np.clip(slope_db, -3, 3) * np.log2(hz / SCRAPE_PIVOT_HZ)
        flicker_db = SUSTAIN_FLICKER_DB * walk(SUSTAIN_FLICKER_PER_S)
        tone = np.sin(wavering(hz, SUSTAIN_WAVER_SHARE * width, rate=110))
        tones = tones + undb(place_db + bright_db + flicker_db) * tone
    return undb(SUSTAIN_DB) * held * tones / tones.std()


def scrape():
    """The edge snaps, sticks and slips along the steel; which high tones sing depends on where it touches."""
    gain, slope_db = blend([push(*row) for row in SCRAPES])
    catches = slips(1200, spread_db=3.5) * gain
    force = colour(tilt(catches, slope_db, pivot_hz=SCRAPE_PIVOT_HZ), EDGE_COLOUR)
    along = (T > SLIDE_SHIFT_S).astype(float)
    singing = 0
    for place, share in enumerate([1 - along, along]):
        body = []
        for hz, width, *dbs in SLIDE:
            # wider resonances get more level and die sooner
            body += cluster(hz, width, dbs[place] + 6 * np.log10(width), SLIDE_RING / np.sqrt(width))
        singing = singing + ring(force * np.sqrt(share), modes(body))
    singing = bend(singing, depth=.00001, rate=46)
    grit = colour(hiss(force, t60=.007), GRIT_COLOUR)
    snap = colour(hiss(blows(SNAPS), t60=0.045), SNAP_COLOUR)
    rough = in_room(undb(-7) * grit + undb(-7.5) * snap, wet_db=-3.0)
    return undb(-4.5) * singing + sustained(gain, slope_db, along) + rough


def short_tones():
    """Squeaks of the edge and two small tinks: each is one wavering, unsteady tone held for a moment."""
    tones = 0
    for s, length, hz, db in SHORT_TONES:
        gain = undb(db + 2 * walk(60)) * stroke(s, length, TONE_ATTACK_S, TONE_RELEASE_S)
        tones = tones + gain * np.sin(wavering(hz, TONE_WAVER_HZ, rate=120))
    return in_room(np.sqrt(2) * tones, wet_db=-7.5)


def ticks():
    """Each tick is a tiny dry crack, too light to set the whole sheet ringing."""
    out = np.zeros(N + SR)
    hz, shape = np.transpose(TICK_COLOUR)
    for s, db, brightness in TICKS:
        tone = np.c_[hz, shape + brightness * np.log2(hz / TICK_PIVOT_HZ)]
        crack = colour(rng.standard_normal(SR) * fade(TICK_T60_S), tone)
        start = int(s * SR)
        # the energy of 10 ms at the given rms level
        out[start:start + SR] += unit(crack) * undb(db) * np.sqrt(SR / 100)
    return in_room(out[:N], wet_db=-3)


def drag():
    """A hollow rub, a broad band of noise whose pitch falls as the glove slows."""
    progress = np.clip((T - DRAG_S) / DRAG_LENGTH_S, 0, 1)
    pitch = DRAG_START_HZ * (DRAG_END_HZ / DRAG_START_HZ) ** progress
    phase = 2 * np.pi * np.cumsum(pitch) / SR
    rub = walk(DRAG_WIDTH_HZ) * np.sin(phase) + walk(DRAG_WIDTH_HZ) * np.cos(phase)
    gain = undb(DRAG_DB) * stroke(DRAG_S, DRAG_LENGTH_S, DRAG_ATTACK_S, DRAG_RELEASE_S)
    return in_room(gain * rub, wet_db=-9)


def landings():
    """A full landing is a knock that also rings the flange; where it hits decides which tones speak."""
    out = knocks([row[:4] for row in LANDINGS])
    for place, (s, *_, ring_db) in enumerate(LANDINGS):
        tones = []
        for hz, *dbs, t60 in FLANGE:
            tones += cluster(hz, FLANGE_WIDTH_SHARE * hz, dbs[place], t60)
        flange = modes(tones, bloom_cycles=1.0)
        out = out + in_room(ring(blows([(s, ring_db)]), flange), wet_db=-9)
    return out


def scene():
    """All the handling sounds over the hum."""
    background = hum() + soft_sounds()
    freeing = clank() + wobble() + booms() + knocks(KNOCKS) + scrape()
    return (background + freeing + short_tones() + ticks() + drag() + landings())[None]


def record(dry):
    """A steep low-pass filter removes the very highest treble."""
    return signal.sosfilt(signal.ellip(10, .2, 80, TOP_HZ, fs=SR, output="sos"), dry)


dry = scene()
out = record(dry)
store_pcm(out)
```